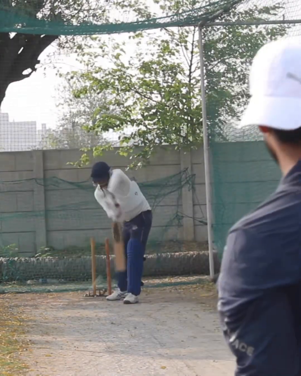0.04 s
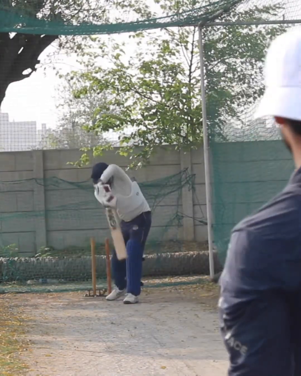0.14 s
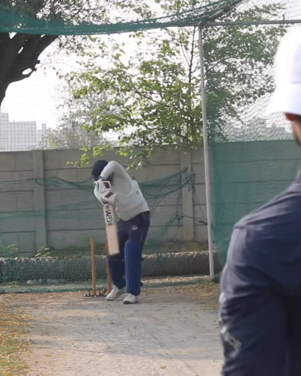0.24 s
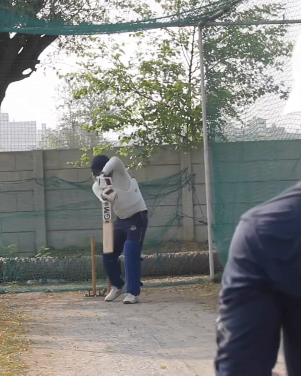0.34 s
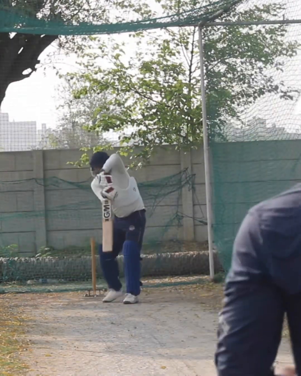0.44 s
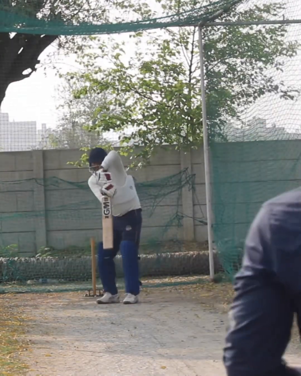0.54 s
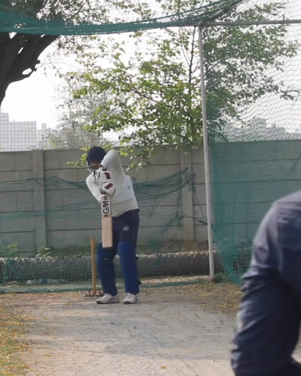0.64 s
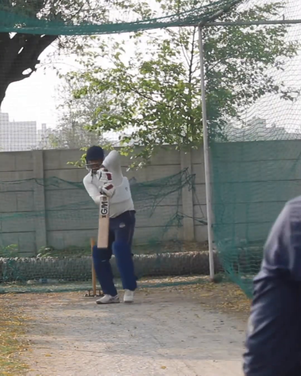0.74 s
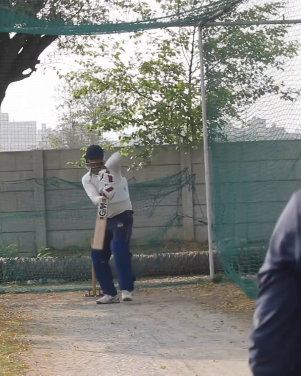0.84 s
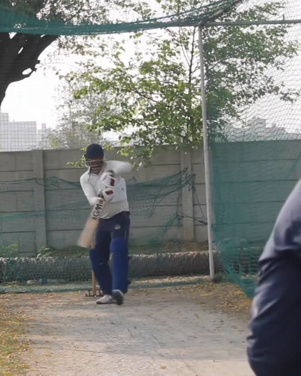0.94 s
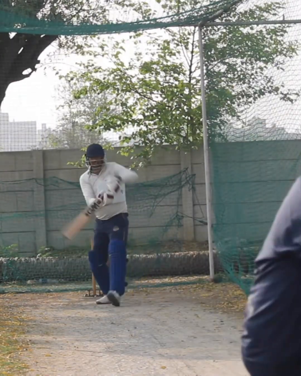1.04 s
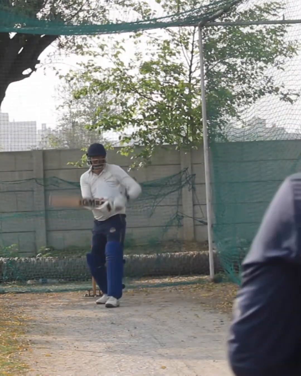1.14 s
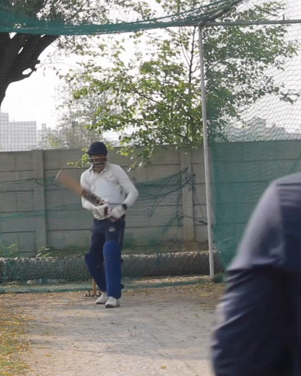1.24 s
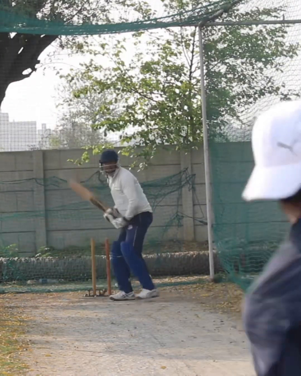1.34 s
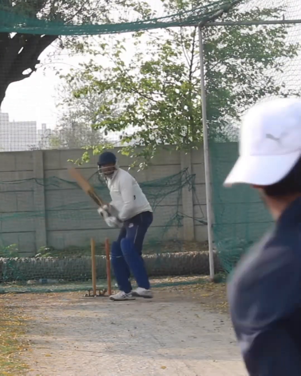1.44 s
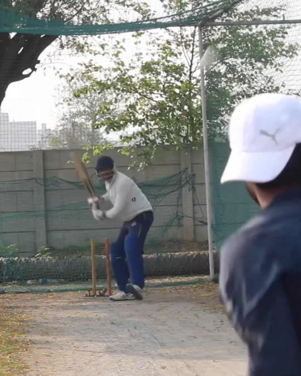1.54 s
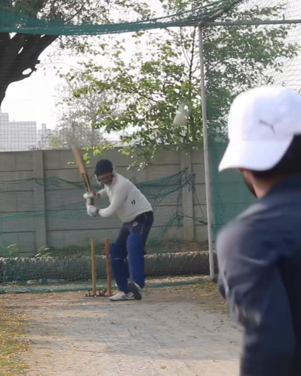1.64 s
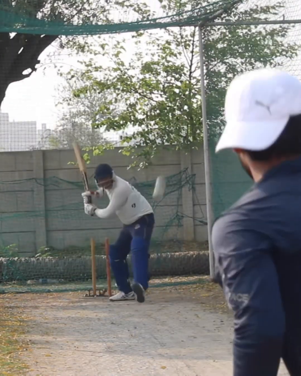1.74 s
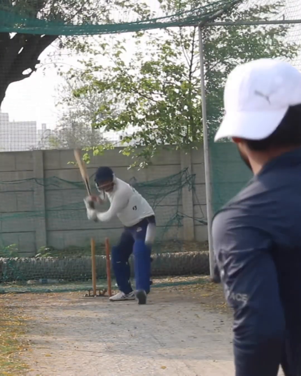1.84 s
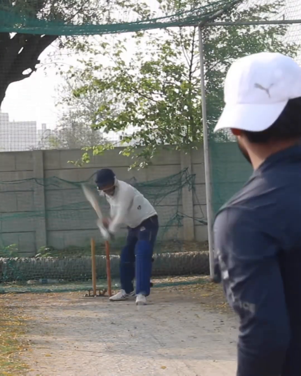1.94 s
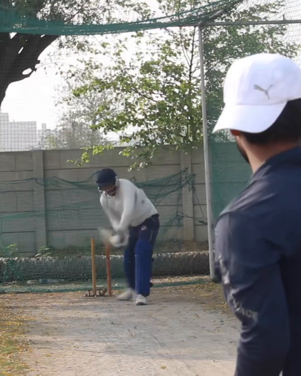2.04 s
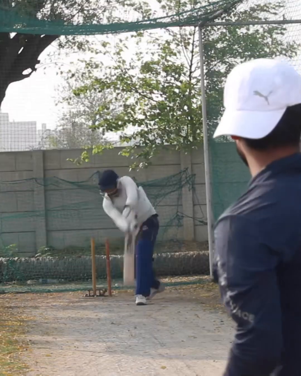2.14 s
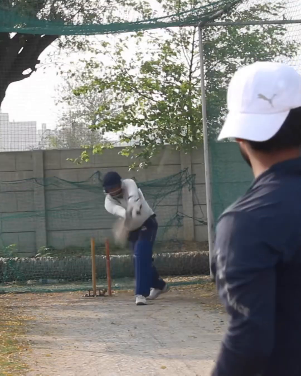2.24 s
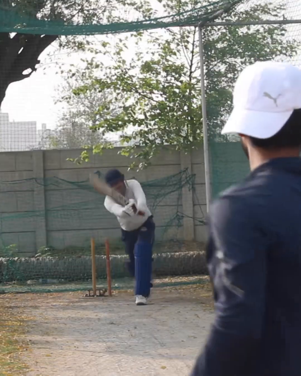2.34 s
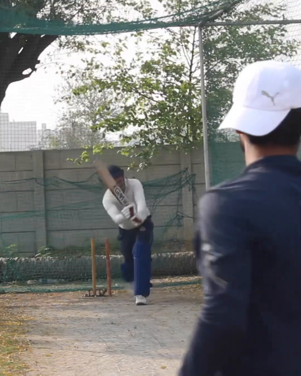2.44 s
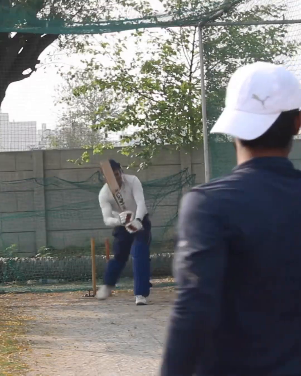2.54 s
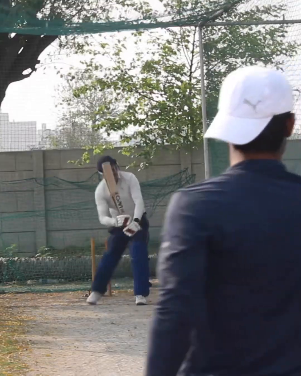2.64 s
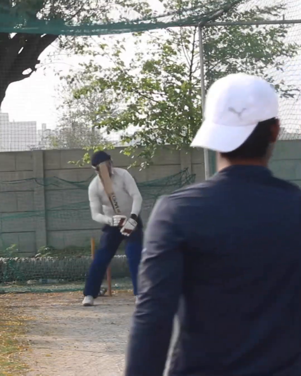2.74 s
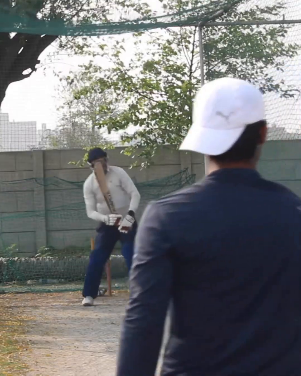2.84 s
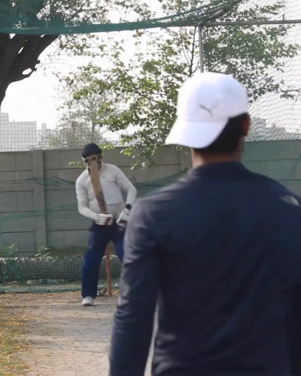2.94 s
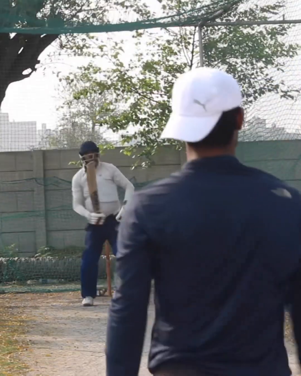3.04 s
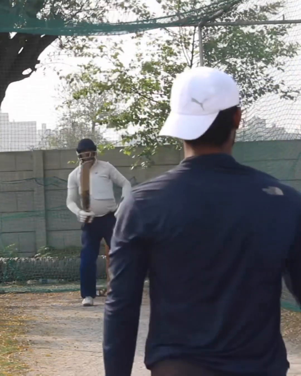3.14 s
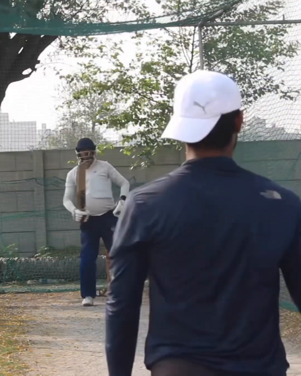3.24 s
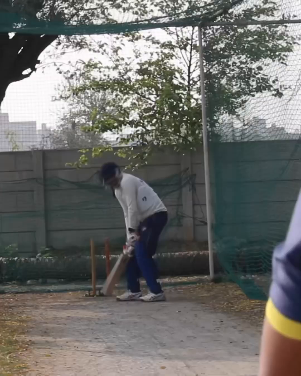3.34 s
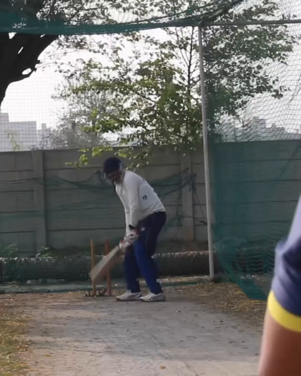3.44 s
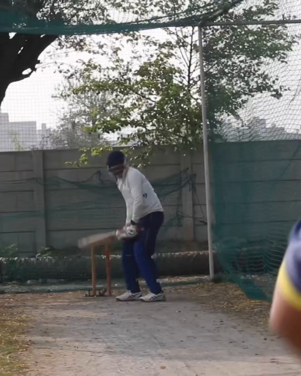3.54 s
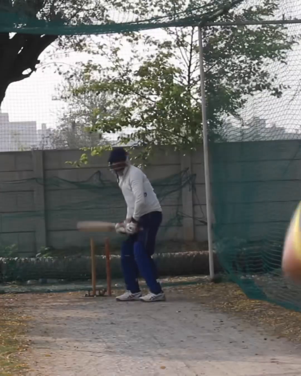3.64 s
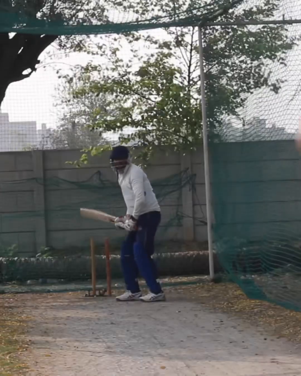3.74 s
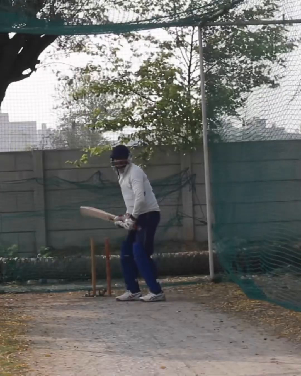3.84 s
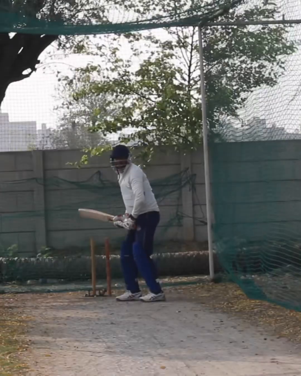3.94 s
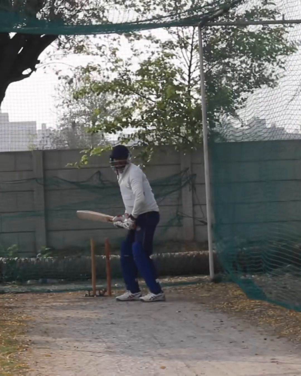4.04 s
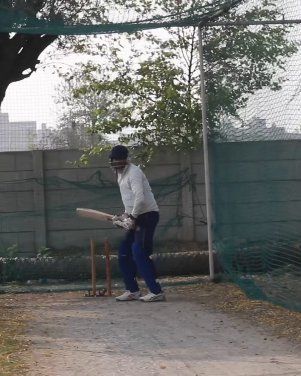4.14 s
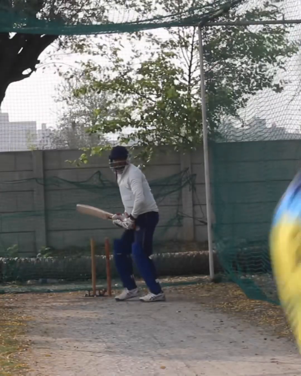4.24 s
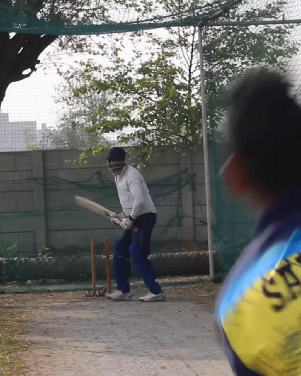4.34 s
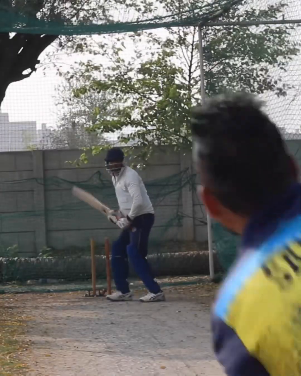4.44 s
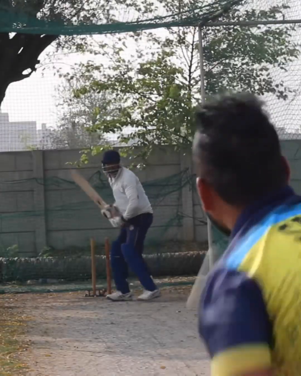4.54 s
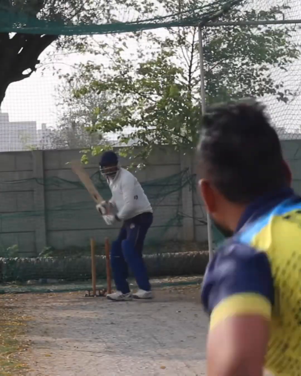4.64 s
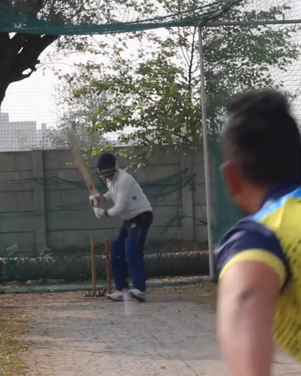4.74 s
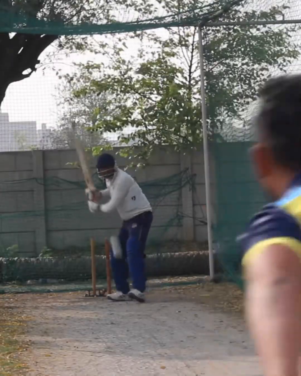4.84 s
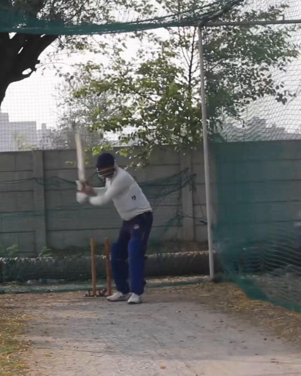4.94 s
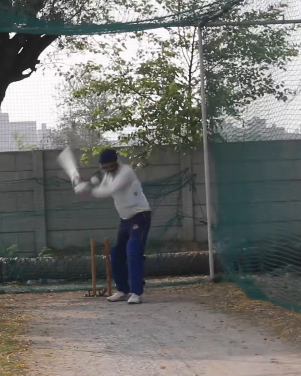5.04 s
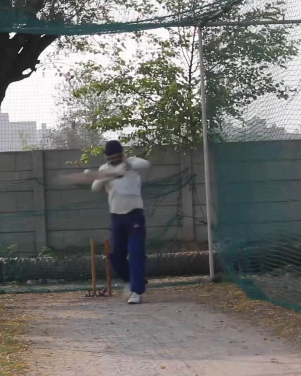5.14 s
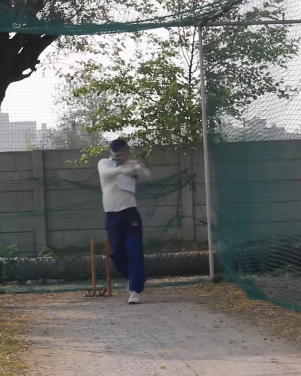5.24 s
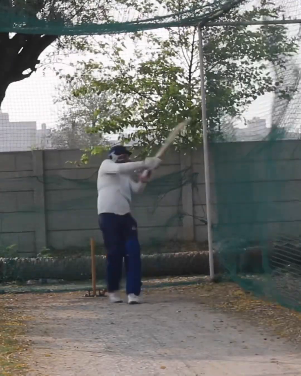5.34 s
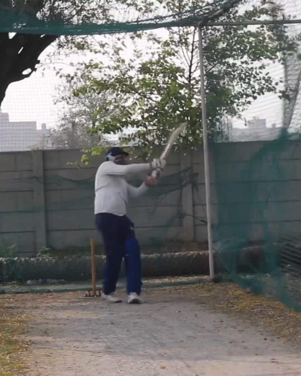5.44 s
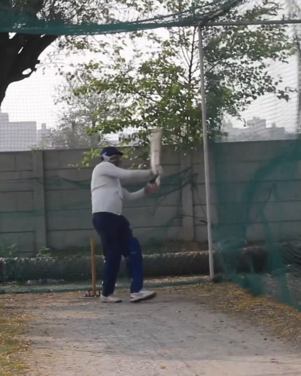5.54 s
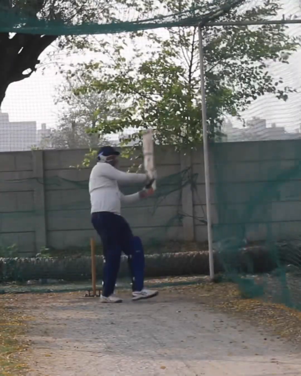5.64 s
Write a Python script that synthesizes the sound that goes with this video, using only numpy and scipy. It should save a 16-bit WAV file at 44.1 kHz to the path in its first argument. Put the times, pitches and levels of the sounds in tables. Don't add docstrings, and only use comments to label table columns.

```python
import sys
import numpy as np
from scipy import signal
from scipy.fft import rfft, irfft, next_fast_len
from scipy.io import wavfile
from scipy.ndimage import uniform_filter1d, map_coordinates

SR = 44100
rng = np.random.default_rng(int(sys.argv[2]) if len(sys.argv) > 2 else 0)


def pcm_store(signal):
    levels = np.round(np.clip(np.atleast_2d(signal), -1, 1) * 32767)
    wavfile.write(sys.argv[1], SR, levels.astype(np.int16).T)


def undo_db(level):
    steps = np.asarray(level, float) / 20
    return 10 ** steps


N = 251502
T = np.arange(N) / SR


def unit(x):
    return x / np.sqrt(np.mean(x ** 2) + 1e-20)


def along(points, hz):
    f, value = np.transpose(points)
    return np.interp(np.log(hz + 1), np.log(f + 1), value)


def noise(n, gain):
    m = next_fast_len(n)
    spectrum = rfft(rng.standard_normal(m)) * gain(np.fft.rfftfreq(m, 1 / SR))
    return unit(irfft(spectrum, m)[:n])


def add(track, s, sound):
    part = track[round(s * SR):][:len(sound)]
    part += sound[:len(part)]


# t/s, ring level/dB, ring f/Hz, crack level/dB, yard level/dB
BLOWS = [
    (0.0005, -1.5, 1410, -11.5, -15.5),
    (0.2696, 0, 594, -7.5, -26),
    (2.0059, -3.5, 570, -15.5, -34),
    (2.1646, 16, 591, 4, -13),
    (2.3999, -12, 1630, -15.5, -22),
    (3.2305, 1, 670, -36, -34.5),
    (4.640, 4, 593, -8.5, -28),
    (4.8398, -14, 1030, -26, -24.5),
    (5.1711, 24, 1395, 14, -12),
    (5.193, -0.5, 1270, -29, -44),
]
# t/s, ring level/dB, ring f/Hz, crack level/dB
ECHOES = [(.002, -5.5, 2100, -23), (0.0327, -1, 405, -29), (.066, -22, 1280, -29), (2.1667, 1.5, 1220, -8),
          (2.1758, -3.5, 710, -22), (2.1777, -3.5, 1080, -15), (2.1958, -6, 605, -32),
          (2.2134, -6, 755, -37), (2.006, -23, 1670, -20.5), (3.2297, -14.5, 1330, -26),
          (4.195, -16, 560, -39), (4.235, -26, 900, -41), (5.187, -4.5, 830, -17), (5.2185, 3, 1290, -27),
          (5.2268, -13, 1340, -40), (5.687, -13.5, 1240, -38)]
# t/s, ring level/dB, ring f/Hz, crack level/dB
MORE_ECHOES = [(0.0126, -18, 1190, -28), (.0145, -17, 800, -32), (.0275, -10, 900, -32), (.0595, -22, 1300, -42),
               (2.1725, -17, 700, -32), (2.1903, -19, 1290, -30), (2.2073, -19, 1500, -38),
               (2.2162, -14, 1400, -42), (2.2197, -15, 1300, -40), (2.235, -22, 1400, -48),
               (3.27, -27, 1610, -44), (5.1828, -5, 1100, -30), (5.196, -12, 1020, -34), (5.2002, -6, 740, -36),
               (5.2027, -27, 1300, -31), (5.2097, -17, 1300, -36), (5.2352, -19, 1300, -41),
               (5.2438, -24, 900, -41)]
# t/s, level/dB, f/Hz, T60/s
RINGS = [(0.269, -13.5, 3020, 0.067), (.26, -16, 1417, 0.022), (.277, -13.5, 547, 0.033),
         (.292, -19, 757, 0.08), (2.166, -6, 109, .03), (2.1692, -4.5, 470, 0.012),
         (2.2257, -20, 1320, .015), (2.382, -28, 1160, 0.03), (2.395, -21.5, 1350, 0.062),
         (2.717, -29, 1483, .058), (3.231, -13, 234, 0.035), (3.246, -17, 300, 0.026),
         (3.27, -23.5, 250, 0.037), (4.362, -21, 1480, 0.021), (4.6404, 0, 4040, 0.0021),
         (4.642, -34, 3200, .04), (4.367, -17.5, 1710, 0.027), (5.174, -8.5, 107, 0.027),
         (5.23, -13.5, 1385, 0.016), (5.252, -30, 1400, 0.042), (5.275, -40, 1410, 0.23),
         (5.642, -23.5, 1284, 0.029)]
# t/s, crack level/dB, yard level/dB
TICKS = [(0.0137, -24, -47), (.26, -24, -20), (0.293, -32, -31), (0.424, -29, -46), (.505, -40, -47),
         (0.653, -43, -52), (2.334, -30, -43), (2.0863, -23.5, -45), (2.226, -36, -35),
         (3.7345, -26.5, -47), (4.224, -24.5, -34), (4.252, -40, -34), (4.368, -22.5, -31.5),
         (5.183, -17, -34), (5.643, -30, -35)]
BLOW_T60_S, ECHO_T60_S = 0.0047, 0.0091


def knocks():
    out, t = np.zeros(N), T[:SR // 8]
    rings = [(s, db, hz, BLOW_T60_S) for s, db, hz, *_ in BLOWS]
    rings += [(s, db, hz, ECHO_T60_S) for s, db, hz, _ in ECHOES + MORE_ECHOES]
    rings += RINGS
    for s, ring_db, hz, t60 in rings:
        swell = 1 - np.exp(-(t * hz / .6) ** 2)
        decay = undo_db(ring_db - 60 * (t / t60) ** 1.246)
        add(out, s, decay * swell * np.sin(2 * np.pi * hz * t))
    for s, *_, crack_db, yard_db in BLOWS + TICKS:
        add(out, s, undo_db(crack_db + 6.0) * crack(crack_db))
        add(out, s, undo_db(yard_db) * yard())
    for s, *_, crack_db in ECHOES + MORE_ECHOES:
        add(out, s, undo_db(crack_db + 9.0) * crack(crack_db + 5))
    return out


# f/Hz, level/dB per Hz
CRACK = [(900, -8), (2000, 12.5), (4000, 14), (7000, 8), (10000, 6.5), (15000, -21)]
DULL_HZ, OPENS_DB = 9000, 15.5


def crack(force_db):
    t = T[:SR // 16]
    push = .5 * undo_db(-60 * t / .0055) * rng.standard_normal(len(t))
    push[6] = 2
    hz = np.fft.rfftfreq(len(t), 1 / SR)
    treble_hz = DULL_HZ * 2 ** (force_db / OPENS_DB)
    gain = undo_db(along(CRACK, hz)) / np.sqrt(8 + (hz / treble_hz) ** 4)
    edge = irfft(rfft(push) * gain, len(t))[:len(t) // 2]
    return edge / np.abs(edge).max()


# f/Hz, level/dB per Hz
YARD_COLOUR = [(88, -42), (150, 2), (805, -0.5), (1080, -5.5), (1310, -2), (1660, -4.5), (2140, -14),
               (3840, -11.5), (8900, -23), (13200, -31), (16000, -60)]
# f/Hz, T60/s
YARD_T60 = [(300, 0.13), (1300, 0.23), (5000, 0.23), (12000, 0.27)]
YARD_GRAIN_DB = 1.2


def yard():
    burst = noise(SR // 2, lambda f: undo_db(along(YARD_COLOUR, f)))
    hz, t, z = signal.stft(burst, SR, nperseg=128)
    decay = undo_db(-60 * t / along(YARD_T60, hz)[:, None])
    tail = signal.istft(z * decay, SR, nperseg=128)[1]
    grains = unit(undo_db(YARD_GRAIN_DB * noise(len(tail), lambda f: f < 400)))
    build_up = 1 - np.exp(-(T[:len(tail)] / .009) ** 2)
    return grains * tail * build_up


POLE_HITS = [
    0.27,
    2.3995,
]
POLE_HZ = [2963.3, 2999.7, 3034, 3076, 3060, 3242, 3284, 3376, 8314, 8414, 3208, 3343, 3725, 8624]
# level/dB, T60/s
POLE_RING = [(-22, 1.2), (-15, 1.0), (-19.5, .66), (-21, .66), (-23, .55), (-31, .5), (-31, .45),
             (-28, .33), (-19.5, .31), (-33, .25), (-32, .45), (-27, .28), (-34, .35), (-39, .3)]
# f/Hz, level/dB, T60/s
FAR_POLE = [(3165, -31, .2), (3210, -36, .15), (9100, -38, 0.13), (9000, -42, .1)]
IN_STEP_S = .01


def poles():
    out, t = np.zeros(N), T[:SR]
    near_pole = [(hz, *ring) for hz, ring in zip(POLE_HZ, POLE_RING)]
    for s, modes in zip(POLE_HITS, (near_pole, FAR_POLE)):
        for hz, db, t60 in modes:
            shimmer = 1 + .16 * noise(len(t), lambda f: f < hz / 70)
            add(out, s, shimmer * undo_db(db - 60 * t / t60) * np.sin(2 * np.pi * hz * (t + IN_STEP_S)))
    return out


# t/s, level/dB
GRIT = [(0.7011, -31), (0.712, -32), (0.7225, -32), (0.7312, -27), (0.7405, -32), (0.754, -33),
        (0.7648, -33), (0.776, -30), (0.7814, -34), (2.0099, -37), (2.0189, -37), (2.023, -32),
        (2.0276, -38), (2.0322, -37), (2.0392, -37), (2.4061, -31), (2.4116, -36), (2.4186, -34),
        (2.4275, -35), (2.4383, -31), (2.4488, -36), (2.4561, -36), (2.4765, -39), (2.485, -43),
        (2.4926, -39), (2.5028, -41), (2.513, -38), (2.5195, -38), (2.5318, -41), (2.5459, -38),
        (2.5526, -38), (2.5614, -41), (2.5728, -34), (2.5805, -36), (2.5976, -38), (2.6048, -36),
        (2.6521, -41), (2.6644, -37), (2.6744, -35), (2.6823, -38), (2.6946, -42), (2.7176, -38),
        (4.6435, -25), (4.646, -28), (4.6532, -32), (4.6651, -31), (4.6755, -28)]


def grit():
    out = np.zeros(N)
    for s, db in GRIT:
        add(out, s, undo_db(db + 6.5) * crack(force_db=-7))
    return out


# start t/s, rise t/s, fall t/s, level/dB, centre f/Hz
SCUFFS = [(.15, 0.035, .04, -42.5, 6000), (.655, 0.061, 0.25, -38.5, 6500),
          (2.021, .027, 0.092, -50.5, 5970), (2.421, .024, 0.12, -46, 4000),
          (2.548, 0.033, 0.048, -53, 6960), (4.299, 0.055, 0.11, -41.5, 6760),
          (4.842, 0.037, 0.007, -22, 1320), (4.844, 0.024, 0.033, -36, 5500),
          (5.02, .046, .042, -40.5, 2400), (5.62, .045, .05, -48, 2000)]
# start t/s, rise t/s, fall t/s, level/dB, centre f/Hz
SQUEAKS = [
    (4.378, 0.011, .012, -34, 11300),
    (4.395, .0065, .008, -42, 9600),
    (3.2605, .001, .002, -42, 9500),
]
SCUFF_OCTAVES, SQUEAK_OCTAVES = 0.8, 0.063


def scuffs():
    out = np.zeros(N)
    strokes = [(*row, SCUFF_OCTAVES) for row in SCUFFS]
    strokes += [(*row, SQUEAK_OCTAVES) for row in SQUEAKS]
    for s, rise, fall, db, hz, octaves in strokes:
        t = T[:int((rise + fall) * SR)]
        stroke = np.sin(np.pi / 2 * np.minimum(t / rise, (rise + fall - t) / fall)) ** 2
        grains = unit(undo_db(2.7 * noise(len(t), lambda f: f < 500)))
        hiss = noise(len(t), lambda f: np.exp(-(np.log2((f + 1) / hz) / octaves) ** 2 / 2))
        add(out, s, undo_db(db) * stroke * grains * hiss)
    return out


def glide(length, from_hz, to_hz, bend, rough):
    u = np.linspace(0, 1, int(length * SR))
    hz = from_hz + (to_hz - from_hz) * u ** np.clip(bend, .2, 4)
    hz = hz * (1 + .017 * rough * noise(len(u), lambda f: (f > 0) * (f < 45)))
    flutter = 1 + rough * noise(len(u), lambda f: (f > 0) * (f < 140))
    swell = np.abs(np.sin(np.pi * u)) ** .35
    return swell * flutter * np.sin(2 * np.pi * np.cumsum(hz) / SR)


# offset t/s, length t/s, from f/Hz, to f/Hz, level/dB
CHIRRUP = [
    (-.038, .026, 4400, 3980, -5),
    (-.004, .025, 6600, 6100, -2),
    (.026, .027, 5600, 4850, -2),
    (.056, .031, 4200, 3450, -2),
]
# t/s, level/dB
CHIRRUPS = [(.39, -48.5), (.67, -46), (0.953, -45), (1.239, -47.5), (1.59, -51.5), (1.865, -55),
            (2.13, -46), (2.691, -50), (2.98, -50), (3.25, -47), (3.485, -52)]
# t/s, length t/s, from f/Hz, to f/Hz, level/dB
HELD = [(.77, .2, 1380, 1370, -49), (.78, .2, 1050, 930, -48), (1.075, .125, 2720, 2750, -44),
        (1.82, .14, 1370, 1420, -47), (1.94, .16, 1430, 1350, -38), (2.03, .12, 1950, 2010, -44),
        (2.95, .05, 2650, 2750, -46), (2.965, .055, 3200, 3150, -48), (3.06, .05, 2450, 2700, -44),
        (3.43, .09, 3120, 3080, -53), (3.44, .03, 4250, 4200, -45), (3.5, .17, 1790, 1830, -43.5),
        (3.84, .05, 3520, 3520, -48), (4.04, .16, 1800, 1830, -45.5), (5.44, .06, 2650, 2900, -45)]
# t/s, length t/s, from f/Hz, to f/Hz, level/dB
FAINT = [(.81, .018, 3800, 3500, -48), (.968, .022, 3900, 3650, -48), (2.11, .04, 1380, 1330, -45),
         (2.53, .035, 3850, 3850, -52), (2.645, .095, 3870, 3820, -52), (2.855, .04, 5300, 5950, -55),
         (2.92, .05, 4400, 5600, -55), (3.035, .022, 4950, 4720, -52), (3.085, .02, 3900, 4200, -52),
         (3.93, .04, 4300, 5350, -52), (4.045, .04, 4700, 5000, -52), (4.078, .022, 5600, 4900, -51),
         (4.333, .022, 3300, 3600, -49), (4.493, .022, 3300, 3600, -49), (4.648, .035, 2950, 3400, -48),
         (4.86, .03, 3700, 4100, -46)]
# t/s, length t/s, from f/Hz, rise f/Hz, level/dB
UPSLURS = [(3.742, .05, 3120, 1030, -39), (3.905, .05, 3150, 950, -48), (3.95, .035, 3200, 500, -48),
           (4.025, .03, 3500, 700, -43), (4.05, .045, 3250, 750, -47), (4.408, .045, 3230, 770, -40),
           (4.54, .04, 3500, 800, -45), (4.757, .075, 3130, 620, -41), (4.985, .055, 3370, 680, -39),
           (5.135, .025, 3200, 600, -42), (5.555, .065, 3250, 500, -42), (5.635, .055, 2980, 970, -39)]
# t/s, from f/Hz, level/dB
RISING_PIPS = [(3.715, 4350, -46), (3.787, 4800, -45), (3.79, 3050, -48), (3.99, 4700, -51),
               (4.383, 4700, -49), (4.452, 4900, -50), (4.53, 4850, -50), (4.742, 3450, -42),
               (4.832, 4800, -45), (5.03, 4200, -48)]
# t/s, from f/Hz, level/dB
FALLING_PIPS = [(3.825, 4000, -46), (4.1, 2620, -39), (4.29, 4300, -48), (4.58, 4350, -47),
                (4.615, 6450, -48), (4.93, 5500, -49), (4.96, 4200, -46)]
RISING_S, RISING_HZ, RISING_BEND = .029, 580, .7
FALLING_S, FALLING_HZ = .021, 260
UPSLUR_BEND, OVERSHOOT = 2.2, 1.2


def birds():
    out = np.zeros(N)
    for s, db in CHIRRUPS:
        pitch = 1 + 0.012 * rng.standard_normal()
        for offset, length, from_hz, to_hz, note_db in CHIRRUP:
            note = glide(length, pitch * from_hz, pitch * to_hz, 1.3, rough=0.3)
            add(out, s + offset, undo_db(db + note_db) * note)
    whistles = [(s, length, hz, to_hz, 1, db) for s, length, hz, to_hz, db in HELD + FAINT]
    whistles += [(s, length, hz, hz + OVERSHOOT * rise_hz, UPSLUR_BEND, db)
                 for s, length, hz, rise_hz, db in UPSLURS]
    whistles += [(s, RISING_S, hz, hz + RISING_HZ, RISING_BEND, db) for s, hz, db in RISING_PIPS]
    whistles += [(s, FALLING_S, hz, hz - FALLING_HZ, 1, db) for s, hz, db in FALLING_PIPS]
    for s, length, from_hz, to_hz, bend, db in whistles:
        rough = .12 + length
        add(out, s, undo_db(db - 1.5) * glide(length, from_hz, to_hz, bend, rough))
    for when, pitch, slide, size in rng.random(size=(110, 4)):
        hz = 2400 + 3200 * pitch
        chirp = glide(.015 + .025 * size, hz, hz * (.85 + .3 * slide), 1, rough=.3)
        add(out, when * T[-1], undo_db(-58.5 + 3 * size) * chirp)
    t = T[:SR // 4]
    smear = undo_db(-60 * t / 0.045) * rng.standard_normal(len(t))
    return out + undo_db(-1) * signal.fftconvolve(out, smear / np.linalg.norm(smear))[:N]


def wobble(rate):
    return map_coordinates(rng.standard_normal(int(N * rate / SR) + 4), [T * rate])


# t/s, level/dB
WIND = [(0.0, -35.5), (0.41, -36), (0.89, -37), (1.29, -38.5), (2.2, -37.5), (2.84, -40.5), (3.08, -38),
        (3.46, -38.5), (3.83, -32.5), (4.3, -32), (4.49, -37.5), (4.75, -36.5), (4.97, -35), (5.05, -30.5),
        (5.21, -40), (5.41, -37.5), (5.57, -37.5), (5.7, -41)]
# f/Hz, level/dB per Hz
BUFFET = [(12, -35), (20, -9.5), (76, 1.5), (184, -4.5), (435, -19), (594, -38), (700, -38), (910, -26),
          (1540, -120)]
# t/s, peak level/dB, f/Hz, cycles
THUMPS = [(3.352, -20.5, 78.5, 1.1), (3.654, -20.5, 103, 4.2), (3.727, -19, 69.5, 2.1),
          (3.750, -13, 133, 2.8), (3.796, -15.5, 86, 2.2), (3.84, -24, 142, 3.9), (3.872, -15, 87.3, 4.4),
          (3.927, -17.5, 151.5, 5.4), (4.053, -21, 148, 2.9), (4.068, -9, 86, 1.4),
          (4.083, -13.5, 185.5, 6.1), (4.111, -15, 131, 2.2), (4.148, -17.5, 111, 1.8),
          (4.178, -32, 118, 1.3), (4.263, -13.5, 44.5, 1), (4.308, -22.5, 81, 4), (4.469, -26, 44, 2.5),
          (4.508, -24, 83, 3), (4.72, -17.5, 91, 1.2), (4.807, -25, 73.4, 4), (4.912, -17.5, 60, 1.6),
          (4.951, -15, 70, 1.6), (4.989, -17, 100, 1.1), (5.012, -7, 117, 0.82), (5.047, -26.5, 82.3, 6),
          (5.119, -26.5, 84, 2.5), (5.678, -21, 102, 2.1)]


def wind():
    lumps = undo_db(.8 * wobble(25))
    rumble = unit(lumps * noise(N, lambda f: undo_db(along(BUFFET, f))))
    out = undo_db(np.interp(T, *np.transpose(WIND)) - 0.5) * rumble
    for s, db, hz, cycles in THUMPS:
        u = T[:SR // 5] * hz / np.clip(cycles, .5, 6)
        turn = 2 * np.pi * cycles * (u + 0.069 * u * u)
        ragged = np.sin(turn) - 0.32 * np.cos(2 * turn)
        ragged = ragged + 0.57 * noise(len(u), lambda f: np.exp(-f / 180))
        add(out, s, undo_db(db + 3.0) * np.sqrt(u) * np.exp(-2.5 * u * u) * ragged)
    return out


def patchy(gain, patchy_db):
    z = signal.stft(noise(N, gain), nperseg=512)[2]
    field = uniform_filter1d(rng.standard_normal(z.shape), 6, 0)
    field = uniform_filter1d(field, 12, 1)
    return signal.istft(z * undo_db(patchy_db * unit(field)), nperseg=512)[1][:N]


# f/Hz, level/dB per Hz
TOWN = [(120, -17.5), (200, -3), (223, -10), (254, -5.5), (542, -8), (640, -9), (1150, -6.5), (4050, -18.5),
        (4520, -20), (5140, -22), (10400, -29.5), (14500, -44), (16400, -76)]
# t/s, level/dB
BUSTLE = [(0, 20), (.32, 9.5), (.47, 3.5), (.9, 3), (1.35, 1), (1.97, -0.5), (2.2, 5.5), (2.51, 4),
          (2.95, 0), (3.29, 0), (3.67, 2), (4.09, 1), (4.9, 2.5), (5.33, 5), (5.7, 3.5)]
# road hum level/dB, far traffic level/dB, leaves level/dB
SHOTS = [
    (-41, -43, -50.5),
    (-42, -41, -53.5),
    (-47, -43.5, -51),
]
# t/s, length t/s, f/Hz, level/dB
ENGINE = [
    (.05, 0.6, 272.2, -36.5),
    (1.5, 0.26, 131.7, -33),
    (2.25, 1.18, 180.4, -38),
]
HUM_GROWS, LEAVES_GROW = 0.62, 0.78


def town():
    swell_db = np.interp(T, *np.transpose(BUSTLE))
    shot = np.searchsorted([end for _, end in JOINS], T)
    hum_db, traffic_db, leaves_db = np.transpose(SHOTS)[:, shot]
    low = lambda f: 1 / (1 + (f / 450) ** 4)
    high = lambda f: 1 - 1 / (1 + (f / 3500) ** 4)
    middle = lambda f: np.abs(1 - low(f) - high(f))
    colour = lambda f: undo_db(along(TOWN, f))
    hum = patchy(lambda f: colour(f) * np.sqrt(low(f)), patchy_db=2.0)
    traffic = patchy(lambda f: colour(f) * np.sqrt(middle(f)), patchy_db=2.0)
    leaves = patchy(lambda f: colour(f) * np.sqrt(high(f)), patchy_db=.8)
    out = undo_db(hum_db + HUM_GROWS * swell_db) * hum
    out += undo_db(traffic_db + swell_db) * traffic
    out += undo_db(leaves_db + LEAVES_GROW * swell_db) * leaves
    for s, length, hz, db in ENGINE:
        add(out, s, undo_db(db) * glide(length, hz, hz, 1, rough=0.52))
    return out


# t/s, deepest level/dB, t/s until deepest
DUCKS = [
    (0.0, -14, 0.076),
    (.27, -1, 0.027),
    (2.164, -11, 0.038),
    (5.169, -16, 0.056),
]


def scene():
    duck_db = 0
    for s, db, deepest in DUCKS:
        u = np.maximum(T - s, 0) / deepest
        duck_db = duck_db + db * (u * np.exp(1 - u)) ** 1.5
    close = knocks() + poles() + grit() + scuffs()
    background = birds() + wind() + town()
    return (close + undo_db(duck_db) * background)[None]


def top_cut(x):
    return signal.sosfilt(signal.butter(12, 16600, fs=SR, output="sos"), x)


# f/Hz, level/dB
MIC = [(25, -0.5), (60, 1), (9000, 0), (12000, -7), (14500, -24), (15500, -30)]
# from t/s, to t/s
JOINS = [
    (1.3154, 1.362),
    (3.285, 3.333),
]


def record(dry):
    m = next_fast_len(N + 4096)
    hz = np.fft.rfftfreq(m, 1 / SR)
    x = irfft(rfft(dry, m) * undo_db(along(MIC, hz)), m)[:, :N]
    x = x + undo_db(-75) * noise(N, lambda f: np.exp(-((f - 12000) / 3000) ** 4))
    x = x / (1 + np.abs(x) ** 8) ** (1 / 8)
    for start, end in JOINS:
        fade_out, fade_in = (start - T) * 1000, (T - end) / 0.021
        x = x * np.clip(np.maximum(fade_out, fade_in), 0, 1)
    x = irfft(rfft(x, m) / (1 + (hz / 16300) ** 30), m)[:, :N]
    return top_cut(x)


dry = scene()
out = record(dry)
pcm_store(out)
```